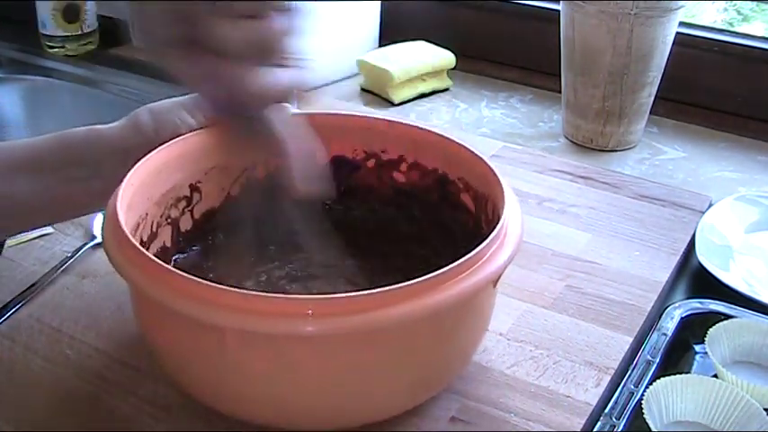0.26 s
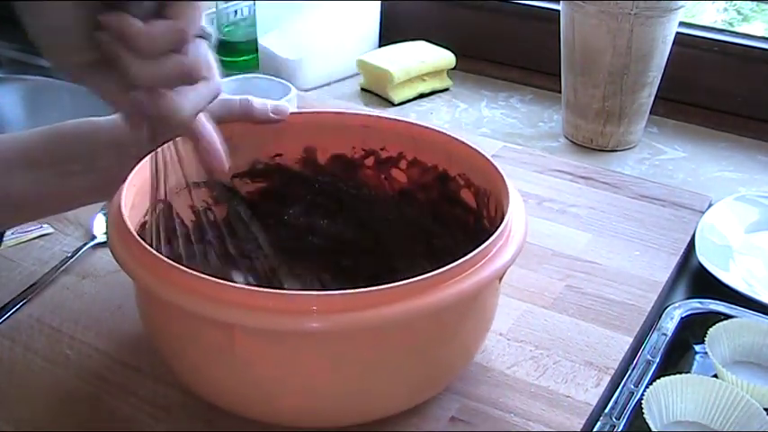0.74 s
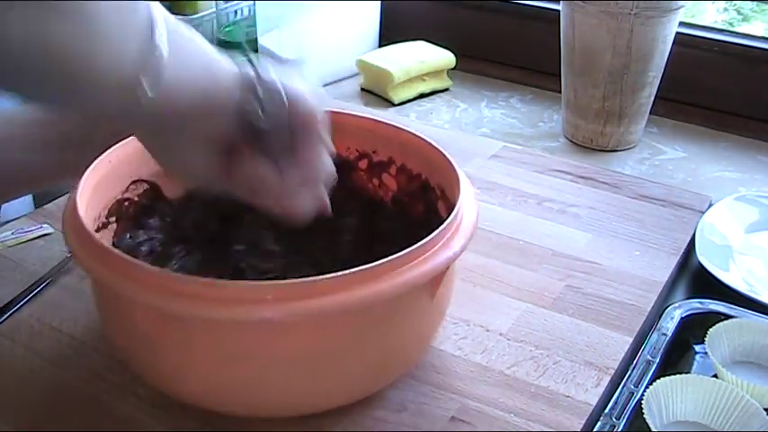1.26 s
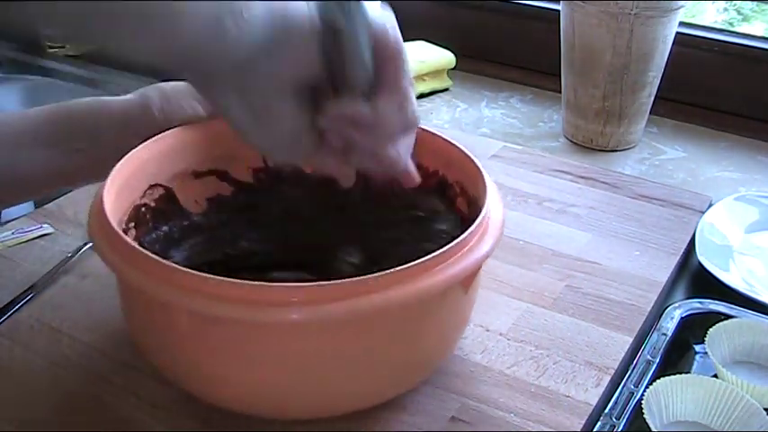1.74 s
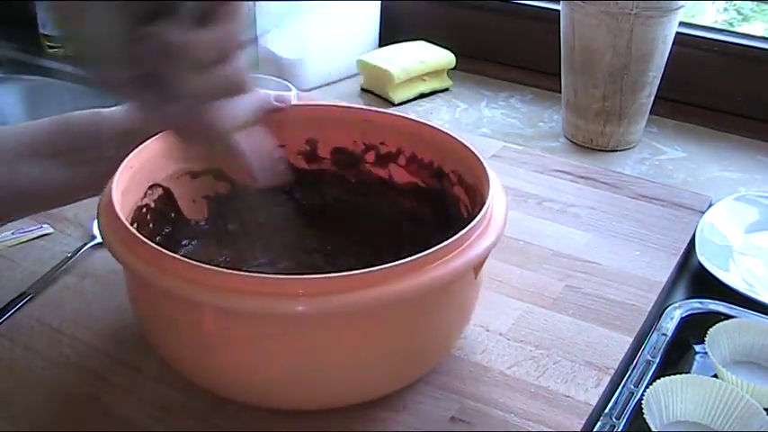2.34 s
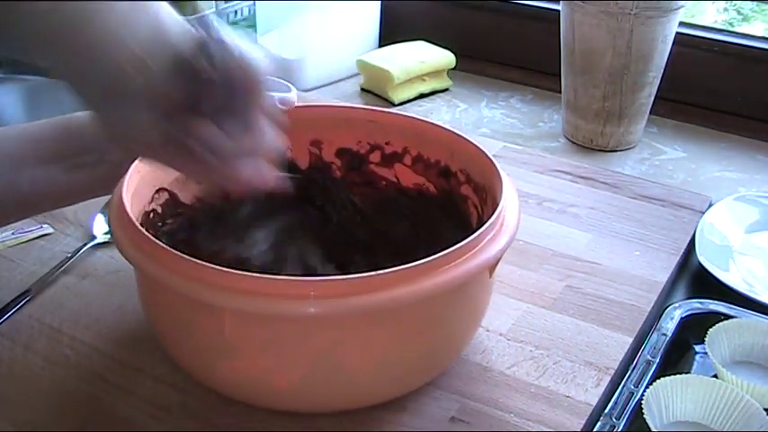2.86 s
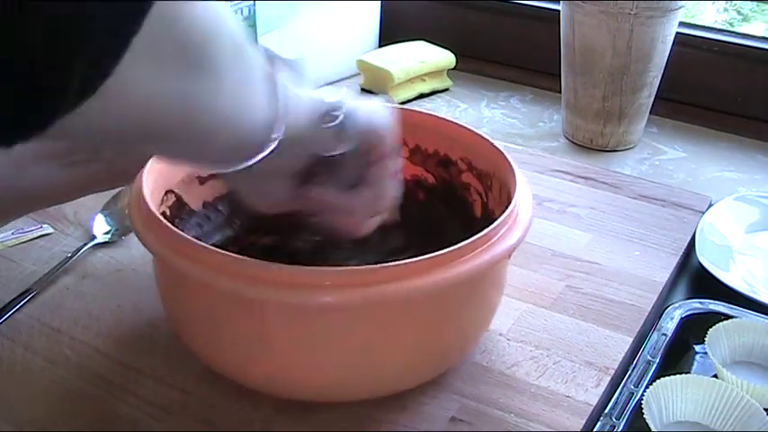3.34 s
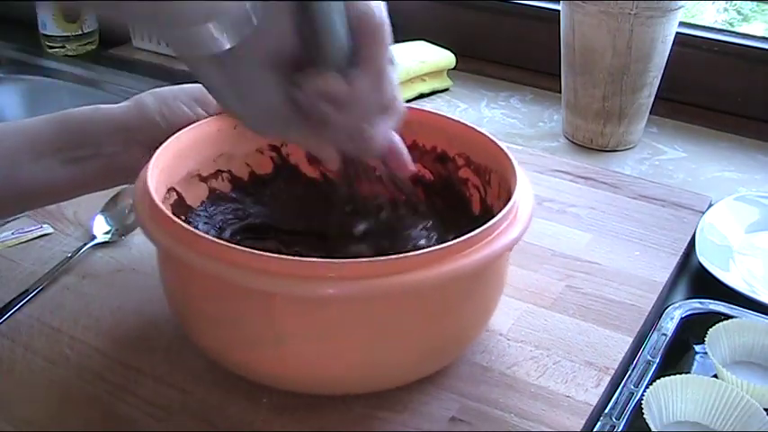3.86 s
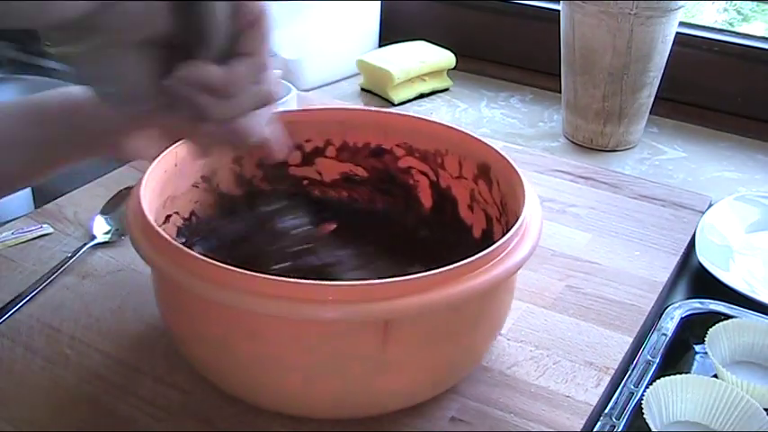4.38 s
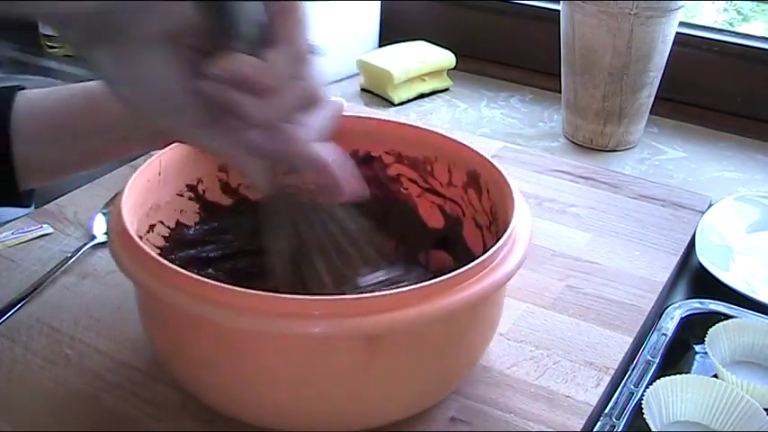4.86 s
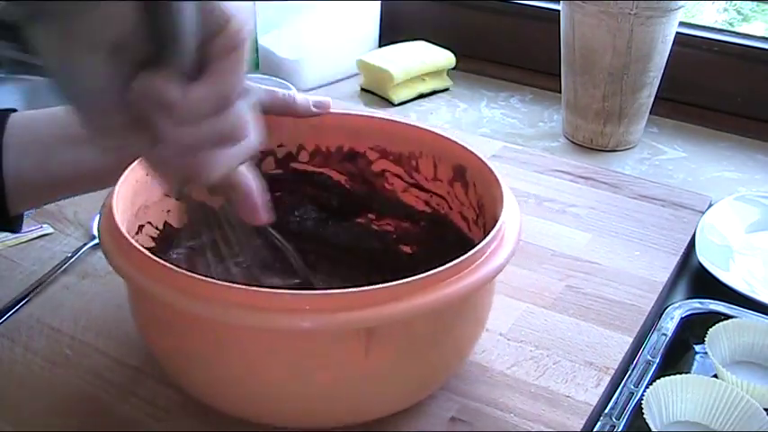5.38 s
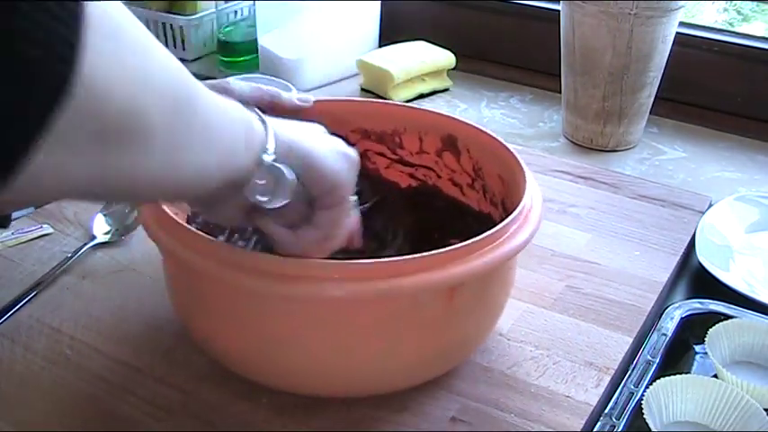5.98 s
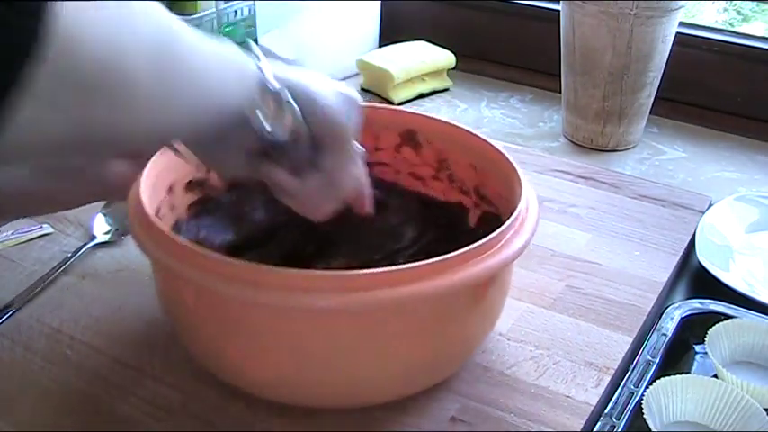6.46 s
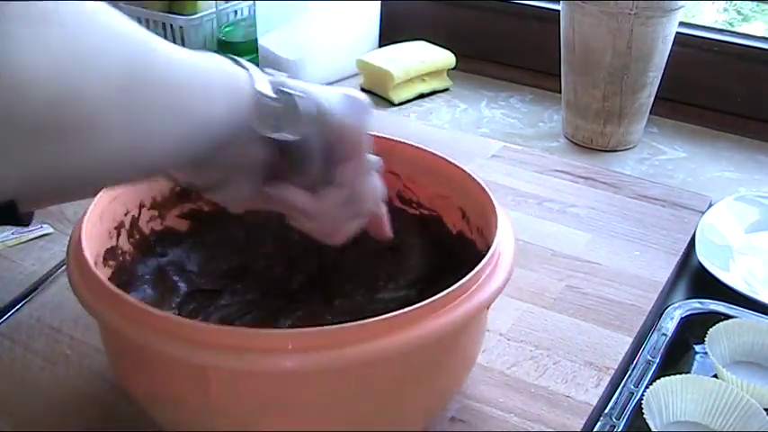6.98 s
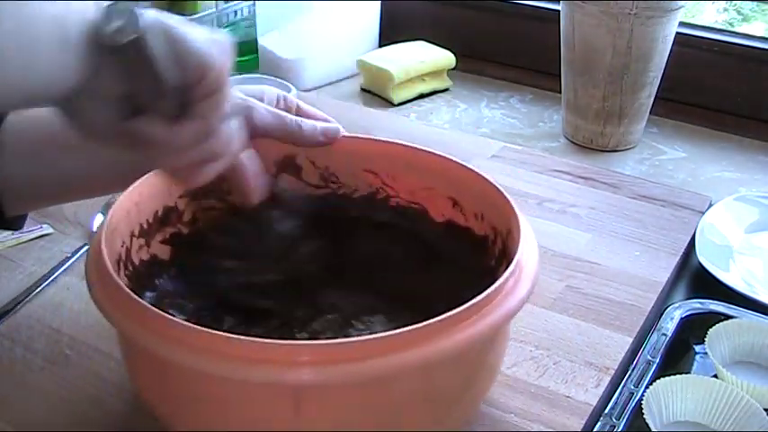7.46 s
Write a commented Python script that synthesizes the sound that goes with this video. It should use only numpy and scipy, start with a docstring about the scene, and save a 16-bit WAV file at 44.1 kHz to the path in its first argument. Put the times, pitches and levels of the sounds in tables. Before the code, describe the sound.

Close up, a metal whisk sweeps round a plastic bowl of sticky batter, dragging and swishing in a lively rhythm. Wet smacks, short popping air bubbles and light metallic ticks ride on each stroke, with occasional hollow bowl knocks and low worktop thumps. It starts lighter, becomes fuller and wetter, and is loudest near the end. A small live kitchen answers over quiet hum and air; the hardest smacks slightly overload.

```python
"""Hard-walled kitchen: a wire whisk is driven round a plastic bowl of thick batter on a wooden worktop.
Drag, shuffle and wet sizzle are shaped noise following timed sweeps; bubbles are short damped tones.
Smacks are ringing air pockets and noise bursts; thumps are damped modes of bowl and worktop.
Noise tails give the echo; air and fridge hum lie below. Two close microphone ports clip the loudest blows."""
import sys
import numpy as np
from scipy import signal
from scipy.fft import rfft, irfft, next_fast_len
from scipy.io import wavfile
from scipy.ndimage import map_coordinates

SR = 44100
rng = np.random.default_rng(int(sys.argv[2]) if len(sys.argv) > 2 else 0)


def unload_wav(signal):
    """Save mono or channel-first audio to the path in sys.argv[1] as 16-bit WAV at rate SR, clipped to [-1, 1]."""
    wavfile.write(
        sys.argv[1],
        SR,
        np.round(np.clip(np.atleast_2d(signal).T, -1, 1) * 32767).astype(np.int16),
    )


N = 340452

# whisk sweeps round the wall: (touch [s], rise [s], contact after the peak [s],
# drag [dB], wet sizzle [dB], shove on the bowl [dB], bubbles [dB])
STROKES = [(0.0, 0.057, .05, -42, -38, -57, -40), (0.19, 0.082, 0.067, -38, -34, -57, -32),
           (0.68, 0.13, 0.065, -42, -38, -45, -44), (1.072, .13, 0.056, -35.5, -35, -46, -33),
           (1.468, 0.048, .17, -33, -35, -27, -34.5), (1.901, .18, 0.028, -36, -38.5, -44, -37),
           (2.332, 0.099, 0.11, -45, -31.5, -48, -37.5), (2.762, 0.077, 0.083, -31.5, -31, -35, -34),
           (3.13, 0.09, .12, -33, -31.5, -30.5, -32), (3.52, 0.15, 0.037, -31.5, -32, -41, -30),
           (3.968, 0.12, 0.16, -31.5, -31.5, -40, -31), (4.461, 0.048, 0.35, -34, -34.5, -44, -31),
           (4.92, 0.082, 0.47, -34.5, -37, -48, -36), (5.328, 0.14, 0.071, -35.5, -29.5, -38, -33.5),
           (5.791, 0.093, 0.041, -26.5, -28.5, -28.5, -29.5), (6.203, 0.028, 0.31, -30.5, -32, -39, -31.5),
           (6.4, 0.18, 0.34, -31, -39, -38, -32.5), (6.759, 0.033, 0.24, -27.5, -37, -38, -23.5),
           (7.1, 0.052, .04, -45, -63, -38, -43), (7.2, 0.064, 0.19, -32.5, -30, -33, -33.5),
           (7.66, 0.044, .05, -55, -43.5, -61, -47)]
# how a layer follows a sweep: (below its peak at the touch [dB], sag in contact [dB/s],
# fall after lift-off [dB/s], rest level [dB])
DRAG_SHAPE = (14.5, 49.5, 102.5, -52)
SIZZLE_SHAPE = (14.5, 42, 190, -55)
SHOVE_SHAPE = (8, 70, 75, -49.5)
# spectrum of wires in batter and on plastic: (frequency [Hz], relative level [dB])
DRAG_SPECTRUM = [(150, -46), (250, -37), (289, -28), (363, 1), (398, -5), (431, 4), (541, 0.5), (601, 3.5),
                 (850, -5), (1110, 0), (1410, -2.5), (2160, -8), (6000, -23), (7800, -17), (13200, -120)]
# spectrum of the wet sizzle: (frequency [Hz], relative level [dB])
SIZZLE_SPECTRUM = [(2060, -1), (3500, -1.5), (5600, -9.5), (7630, -5.5), (9080, -7), (10800, -20.5),
                   (14900, -14.5), (15800, -22), (16300, -42)]
# spectrum of the bowl shuffling on the board: (frequency [Hz], relative level [dB])
SHUFFLE_SPECTRUM = [(15, -48), (25, -27), (48, 5), (75, -4), (130, -1), (141, 2.5), (162, -21), (199, 1.5),
                    (232, -8.5), (251, -5), (276, -6.5), (328, -5.5), (400, -16), (520, -18), (880, -120)]
# air pockets popped by wires smacking the batter: (time [s], level [dB], pitch [Hz], overtones [dB])
POPS = [(0.0272, -19.5, 1760, -16), (0.197, -17, 2200, -18), (0.2476, -15, 3110, -9),
        (0.2737, -17, 2200, -14), (0.3014, -3, 2410, -27), (0.3124, -11, 2250, -26),
        (0.3396, -22, 2700, -16), (0.862, -22, 1530, 1), (2.3927, -11, 1750, -21), (2.4189, -14, 2060, -12),
        (2.4421, -11, 1920, -6), (2.7754, -7, 1900, -21), (3.1291, 1, 1567, -5), (3.5401, -4, 1605, -12),
        (3.699, -14, 1550, -15), (3.707, -10.5, 1420, -15), (3.772, -18.5, 1560, -9),
        (3.9883, -9.5, 1830, -19.5), (4.4906, -3.5, 1880, -25), (4.6344, -14.5, 1690, -9),
        (5.1148, -14, 2030, -15), (6.133, -9.5, 1810, -12), (6.2082, -10.5, 3300, -13),
        (6.7758, -1.5, 1805, -12), (6.782, -1.5, 1660, -10)]
# partials of an uneven pocket: (multiple of pitch [1], level [dB])
POCKET_PARTIALS = [(1, 2), (1.13, -6.5), (.86, -20)]
# its overtones: (multiple of pitch [1], level [dB])
POCKET_OVERTONES = [(2.1, 0), (3.5, -14), (5.3, -12)]
# wires slap the wall: (time [s], level [dB], wire tick [dB], bowl knock [dB])
SLAPS = [(0.0254, -15, -13, -19), (0.0641, -11, -7, -6.5), (0.1965, -10.5, -5, -11),
         (0.3013, -14.5, -12, -4.5), (0.3103, -16, -10, -8), (0.3583, -20.5, 0.5, -14),
         (0.534, -23, -7, -15), (0.6437, -28, -6, -4), (0.7683, -20, 4.5, -2.5), (0.819, -16, -2, -2),
         (0.8611, -18, 0, -24), (1.0819, -28, -25, 10), (1.1938, -5, -5, -11), (1.481, -4, -21, -8),
         (1.5075, -15, -21.5, 6), (1.5361, -16, -15, -4), (1.6797, -14.5, -7, -13), (1.9398, -27, 8, -4),
         (2.0524, -18, -5, 0), (2.0797, -9.5, -0.5, -3), (2.354, -16.5, -7, -8), (2.4344, -13, -2, -24),
         (2.4703, -3.5, -8, -20), (2.54, -18, 0, -25), (2.7743, -5.5, -4.5, -12.5), (2.842, -6.5, 2, -11),
         (2.8457, -7, 10, -12), (2.922, -26.5, -10, 7.5), (2.945, -12.5, -28, -8.5),
         (3.1258, -5.5, -1, -16), (3.187, -5, -5, -5.5), (3.239, -10.5, 0, 1.5), (3.254, -8.5, -16, -8),
         (3.2933, -15, -15, -4), (3.3916, -21, -4, -10), (3.526, -27, -12, 3), (3.538, -8, -1, -21),
         (3.5897, 0, -4.5, -13), (3.711, -14.5, -15, 1), (3.7722, -16, -10, -9), (3.9864, -9, -1.5, -19),
         (4.075, -7.5, 0, -26), (4.1259, -16.5, -17, 1), (4.2766, -24.5, 2, 6.5), (4.4257, -22, -11, -5),
         (4.4393, -22.5, -12, -2), (4.4905, -0.5, -9, -10.5), (4.5221, -12, -1, -16), (4.64, -18, 7.5, -27),
         (4.6766, -25, 15.5, -22), (4.9302, -19, 1, 0.5), (4.9426, -16, 1, -0.5), (5.0389, -8, -14, -5.5),
         (5.046, -7, -6, -9), (5.089, -11.5, -20, -16), (5.118, -14.5, -8, -6.5), (5.321, -20, -4, -7),
         (5.3584, -7, 0, -6), (5.4713, -3.5, -1.5, -19), (5.8001, -17.5, -19, 9.5), (5.8171, -10, -6, -1.5),
         (5.8873, -15, 4, -3), (6.131, -11, 4, -29), (6.2079, -8, 3, -8), (6.6341, -19, -8, 0.5),
         (6.708, -24.5, -4, -6), (6.7386, -21, 0, -0.5), (6.785, 9.5, -40, -10), (7.1167, -12, -28, -4),
         (7.226, -13.5, -2, -8), (7.2452, -7, -7, -33), (7.26, -9.5, 3, -26), (7.5043, -18.5, -7, -2)]
# bands of tick, then splash: (lowest [Hz], width [Hz])
WIRE_BANDS = [(4500, 6000), (900, 5500)]
# finest treble of a slap: (lowest [Hz], width [Hz])
GLINT_BAND = (6100, 11400)
# bowl knocks on the board: (time [s], level [dB], pitch of the loaded base [Hz], worktop boom [dB])
THUMPS = [(0.203, -23, 282, 0.5), (1.081, -10, 375, -4.5), (1.48, -1, 394, -7), (2.051, -22.5, 460, -13),
          (2.356, -24, 308, -24), (3.238, -23, 434, -22), (3.982, -13, 313, -25), (4.277, -16.5, 373, 3),
          (4.94, -20.5, 255, -27), (5.038, -26, 496, 0.5), (5.289, -23.5, 282, 2.5), (5.799, -5, 315, 0),
          (6.211, -27, 393, 1), (7.116, 2, 332, -8.5)]
# modes of the bowl wall: (frequency [Hz], level [dB], t60 [s])
BOWL_MODES = [(412.5, 2.5, 0.017), (577, 7, 0.017), (748, 8, 0.012), (1082, -0.5, 0.042),
              (1673, 0.5, 0.026), (2040, 10.5, 0.006)]
# modes of the worktop: (frequency [Hz], level [dB], t60 [s])
WORKTOP_MODES = [(57.9, -4.5, 0.19), (102.4, -5.5, 0.39), (130, -4, 0.11), (160.4, -5.5, 0.25),
                 (202.4, -9.5, 0.093), (263, -21, 0.28)]
# resonance of the air in the bowl: (centre [Hz], width [Hz], level [dB])
HOLLOW = (608.6, 25, 1)
# reverberation of the kitchen: (frequency [Hz], t60 [s])
KITCHEN_T60 = [(100, 0.52), (1000, 0.42), (4000, 0.55), (12000, 0.42)]
# likeness of the two ports in diffuse sound: (frequency [Hz], correlation [1])
PORT_LIKENESS = [(100, 0.88), (500, 0.93), (1500, 0.82), (4000, 0.5), (12000, 0.038)]
# spectrum of kitchen hum and hiss: (frequency [Hz], relative level [dB])
AIR_SPECTRUM = [(12, -37), (20, 15), (102, 10), (164, 8), (563, 11), (834, 1), (1100, -3.5), (3300, -20),
                (5620, -44.5), (8800, -60), (11000, -6), (15000, -6), (16300, -45)]
# mains hum of a fridge: (frequency [Hz], level [dB])
FRIDGE_HUM = [(50, -57), (100, -57)]
# port imbalance: (frequency [Hz], left minus right [dB])
PORT_IMBALANCE = [(60, 1.5), (240, 2), (950, 2.5), (3770, 1.5), (15000, 0.5)]

TOUCH_S = 0.0053  # onset of a sweep
JERK_DB, FLUTTER_DB, BUBBLE_SPREAD_DB = 2, 1.63, 4.5  # unevenness of drag and bubbles
SKID_OVER_BOOM_DB, SKID_SWELL_S, SKID_FALL_DB_S = -11, 0.053, 210
POP_T60_S, SLAP_T60_S = 0.017, 0.02
PATTER_OVER_DRAG_DB, PATTER_SCATTER_DB, PATTER_TICK_DB, PATTER_KNOCK_DB = 13, 3, -8, -6
SOFT_DB_OCT = -4.5  # a broad blow on the base wakes the high wall modes less
AIR_DB = -55.5
TOP_HZ = 16350  # middle of the band-limit ramp


def drag(jerk_db):
    """Wires drag through batter and along plastic: rough coloured noise, jerking in level."""
    level_db = sweeps(column=3, shape=DRAG_SHAPE) - 2.5 + jerk_db
    return amp(level_db) * coloured(grit(300, spread_db=-4.0), DRAG_SPECTRUM)


def bubbles():
    """Tiny bubbles burst in the batter, in step with the sweeps."""
    level_db = sweeps(column=6, shape=DRAG_SHAPE) - 6.0
    return amp(level_db) * crackle(count=2500, centre_hz=2294, cycles=2.5)


def sizzle(jerk_db):
    """Wet hiss from all round the bowl: rough noise that differs between the ports."""
    near = grit(880, spread_db=9.5)
    flipped = near * np.sign(wobble(3000))
    spread = near + 0.31 * diffuse(np.array([near, flipped]))
    level_db = sweeps(column=4, shape=SIZZLE_SHAPE) - 1.0 + 1.72 * jerk_db
    return amp(level_db) * coloured(spread, SIZZLE_SPECTRUM)


def shuffle():
    """The held bowl rubs on the board with each shove and skids after thumps: low unsteady noise."""
    gain = amp(sweeps(column=5, shape=SHOVE_SHAPE)) + skids()
    unsteady = amp(-8.5 + 5.16 * wobble(25.02))
    return gain * unsteady * coloured(rng.standard_normal(N), SHUFFLE_SPECTRUM)


def sweeps(column, shape):
    """Level [dB] of a layer: each sweep rises, sags while wires stay on the wall, falls when they lift."""
    below_db, sag_db_s, fall_db_s, rest_db = shape
    t, power = np.arange(N) / SR, amp(2 * rest_db)
    for row in STROKES:
        touch_s, rise_s, contact_s = row[0], max(row[1], .005), max(row[2], .005)
        knots_s = touch_s + np.cumsum([-TOUCH_S, TOUCH_S, rise_s, contact_s, 1])
        lifted_db = sag_db_s * contact_s
        drop_db = np.interp(t, knots_s, [60, below_db, 0, lifted_db, lifted_db + fall_db_s])
        power = power + amp(2 * (row[column] - drop_db))
    return 10 * np.log10(power)


def skids():
    """Gain of the bowl's skid on the board, swelling after each thump."""
    t, gain = np.arange(N) / SR, 0
    for s, db, _, boom_db in THUMPS:
        knots_s = [s - .02, s, s + SKID_SWELL_S, s + SKID_SWELL_S + 1]
        drop_db = np.interp(t, knots_s, [90, 15, 0, SKID_FALL_DB_S])
        gain = gain + amp(db + boom_db + SKID_OVER_BOOM_DB - drop_db)
    return gain


def grit(rate, spread_db):
    """Noise roughened by tiny slips of very unequal size, rate slips a second."""
    size = np.minimum(rng.exponential(size=N), 4)
    slips = (rng.random(N) < rate / SR) * amp(spread_db * size)
    bursts = signal.lfilter([1], [1, -np.exp(-1 / (0.00093 * SR))], slips)  # 0.93 ms decay
    return rng.standard_normal(N) * (1 + 0.24 * unit(bursts))


def crackle(count, centre_hz, cycles):
    """Bursting bubbles: short damped tones of scattered pitch and size, at rms 1."""
    when, size = rng.random((2, count))
    hz = centre_hz * np.exp(.5 * rng.standard_normal(count))[:, None]
    t = np.arange(256) / SR
    strength = amp(-BUBBLE_SPREAD_DB * np.log(size + .03))[:, None]
    grains = strength * np.sin(2 * np.pi * hz * t) * np.exp(-t * hz / cycles)
    where = (when * N).astype(int)[:, None] + np.arange(256)
    return unit(np.bincount(where.ravel(), grains.ravel(), N + 256)[:N])


def pops():
    """Air pockets pop under the wires: each rings briefly at its pitch and overtones."""
    out, t = np.zeros(N + SR), np.arange(SR // 8) / SR
    for s, db, hz, over_db in POPS:
        modes = [(hz * k, level, POP_T60_S) for k, level in POCKET_PARTIALS]
        modes += [(hz * k, level + over_db, POP_T60_S) for k, level in POCKET_OVERTONES]
        pop = ring(modes, t, 0.00044, scatter_db=2, detune=0.0036)
        out[round(s * SR):][:len(t)] += amp(db - 3.5) * pop
    return out[:N]


def slaps():
    """Wires slap the wall: a wet splash, a tick of the wires and a knock on the bowl wall."""
    out, t = np.zeros((2, N + SR)), np.arange(SR // 8) / SR
    for s, db, tick_db, knock_db in SLAPS + patter(count=30):
        tick = burst(WIRE_BANDS[0], t, 0.63 * SLAP_T60_S)
        splash = burst(WIRE_BANDS[1], t, SLAP_T60_S)
        # finest treble reaches the ports in opposite sign
        glint = 0.29 * np.outer([1, -1], burst(GLINT_BAND, t, 1.1 * SLAP_T60_S))
        knock = amp(knock_db - 1.0) * ring(BOWL_MODES, t, 0.0013, scatter_db=0.0, detune=0.038)
        slap = splash + amp(tick_db) * (tick + glint) + knock
        out[:, round(s * SR):][:, :len(t)] += amp(db - 6.5) * slap
    return out[:, :N]


def patter(count):
    """Light slaps at chance moments, their level following the drag of the sweeps."""
    when, size = rng.random(count) * N, rng.standard_normal(count)
    drag_db = sweeps(column=3, shape=DRAG_SHAPE)[when.astype(int)]
    db = drag_db + PATTER_OVER_DRAG_DB + PATTER_SCATTER_DB * size
    return [(n / SR, level, PATTER_TICK_DB, PATTER_KNOCK_DB) for n, level in zip(when, db)]


def burst(band, t, t60):
    """A sharp crack and a dying puff of noise in a band."""
    low_hz, width_hz = band
    shape = signal.butter(1, [low_hz, low_hz + width_hz], "band", fs=SR, output="sos")
    noise = rng.standard_normal(len(t)) * amp(-60 * t / t60) * (1 - np.exp(-t / .0006))
    noise[round(.0006 * SR)] += 3  # the crack
    return 1.47 * signal.sosfilt(shape, signal.sosfilt(shape, noise))


def thumps():
    """Hard strokes knock bowl on board: base and wall ring short; the worktop swells and booms on."""
    out, t = np.zeros(N + SR), np.arange(SR // 2) / SR
    lowest_hz = BOWL_MODES[0][0]
    dull = [(hz, db + SOFT_DB_OCT * np.log2(hz / lowest_hz), t60) for hz, db, t60 in BOWL_MODES]
    for s, db, base_hz, boom_db in THUMPS:
        boom = amp(boom_db) * ring(WORKTOP_MODES, t, 0.025, scatter_db=2.0, detune=0.0099)
        wall = ring(dull, t, .0004, scatter_db=1.5, detune=.02)
        base_modes = [(base_hz, 0, .025), (1.28 * base_hz, -4, .02)]
        base = ring(base_modes, t, 0.0021, scatter_db=4.5, detune=0.016)
        knock = amp(-3) * wall + amp(3) * base
        out[round((s + .001) * SR):][:len(t)] += amp(db - 5.5) * (knock + boom)
    return out[:N]


def ring(modes, t, attack, scatter_db, detune):
    """Damped modes, struck at slightly random strengths and pitches."""
    chance = rng.standard_normal((len(modes), 2))
    tones = 0
    for (hz, db, t60), (a, b) in zip(modes, chance):
        decay = amp(db + scatter_db * a - 60 * t / t60)
        tones = tones + decay * np.sin(2 * np.pi * hz * (1 + detune * b) * t)
    return tones * (1 - np.exp(-t / attack))


def hollow(x):
    """The air in the bowl sings along at one pitch: a resonance added to the direct sound."""
    centre_hz, width_hz, db = HOLLOW

    def response(hz):
        damping = 1j * hz * width_hz
        return 1 + amp(db) * damping / (centre_hz ** 2 - hz * hz + damping)
    return filtered(x, response)


def kitchen(x):
    """The walls answer; as arm and bowl move the answer changes: a new noise tail each quarter second."""
    step, out = SR // 4, np.zeros((2, N + 2 * SR))
    for start in range(0, N, step):
        hz, t, z = signal.stft(rng.standard_normal((2, SR * 3 // 4)), SR, nperseg=256)
        decay = amp(-60 * t / along(KITCHEN_T60, hz)[:, None])
        tail = diffuse(signal.istft(z * decay, SR, nperseg=256)[1])
        tail = tail / np.linalg.norm(tail[0])
        wet = signal.fftconvolve(x[None, start:start + step], tail, axes=1)
        out[:, start + 200:][:, :wet.shape[1]] += wet  # 200 samples of delay
    return out[:, :N]


def waver(x, depth_s, rate):
    """Random delay wavers the pitch slightly, blurring narrow bands."""
    at = np.arange(N) + depth_s * SR * wobble(rate)
    return np.array([map_coordinates(c, [at]) for c in x])


def room_air():
    """Steady hum and hiss of the kitchen: diffuse coloured noise."""
    return amp(AIR_DB) * coloured(diffuse(rng.standard_normal((2, N))), AIR_SPECTRUM)


def fridge_hum():
    """Mains tones, wavering slightly in level."""
    t = np.arange(N) / SR
    return sum(amp(db + 1.2 * wobble(4.43)) * np.sin(2 * np.pi * hz * t) for hz, db in FRIDGE_HUM)


def amp(db):
    """Amplitude of a level in dB."""
    return 10 ** (np.asarray(db) / 20)


def unit(x):
    """x at rms 1."""
    return x / np.sqrt(np.mean(x ** 2) + 1e-20)


def along(points, hz):
    """(Hz, value) points interpolated on a log axis."""
    f, v = np.transpose(points)
    return np.interp(np.log(hz + 1), np.log(f + 1), v)


def wobble(rate):
    """A smooth random curve, rate knots a second."""
    return map_coordinates(rng.standard_normal(int(N * rate / SR) + 4), [np.arange(N) * rate / SR])


def filtered(x, response):
    """x times a response of frequency."""
    n = x.shape[-1]
    m = next_fast_len(n + 8192)
    return irfft(rfft(x, m) * response(np.fft.rfftfreq(m, 1 / SR)), m)[..., :n]


def coloured(x, spectrum):
    """x given a spectrum, at rms 1."""
    return unit(filtered(x, lambda hz: amp(along(spectrum, hz))))


def diffuse(pair):
    """Two signals mixed as mid and side; unrelated ones get the likeness of the two ports."""
    def mid_side(hz):
        angle = np.arccos(np.clip(along(PORT_LIKENESS, hz), 0, 1)) / 2
        return np.array([np.cos(angle), np.sin(angle)])
    mid, side = filtered(pair, mid_side)
    return np.array([mid + side, mid - side])


def scene():
    """The bowl, its echo in the room and the steady background."""
    jerk_db = JERK_DB * wobble(45) + FLUTTER_DB * wobble(110)  # shared by drag and sizzle
    rubbing = drag(jerk_db) + bubbles() + shuffle()
    blows = pops() + slaps() + thumps()
    bowl = hollow(rubbing + blows) + sizzle(jerk_db)
    echo = waver(kitchen(bowl.mean(0)), depth_s=.0002, rate=70)
    return bowl + amp(-4.5) * echo + room_air() + fridge_hum()


def record(dry):
    """Unequal ports, dull at both ends, a ceiling at 1 and the band limit."""
    def port_response(hz):
        balance = amp(np.outer([.5, -.5], along(PORT_IMBALANCE, hz)))
        return balance / (1 + (hz / 15000) ** 4) / (1 + (45 / (hz + 1)) ** 3)
    ports = filtered(dry, port_response)
    held = ports / (1 + np.abs(ports) ** 16) ** (1 / 16)
    return filtered(held, lambda hz: np.clip((TOP_HZ + 300 - hz) / 600, 0, 1) ** 2)


dry = scene()
out = record(dry)
unload_wav(out)
```